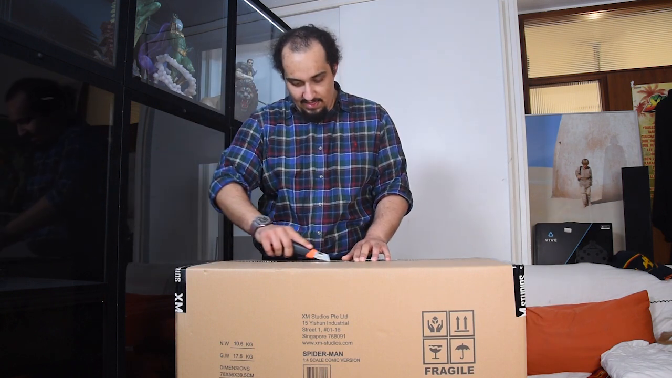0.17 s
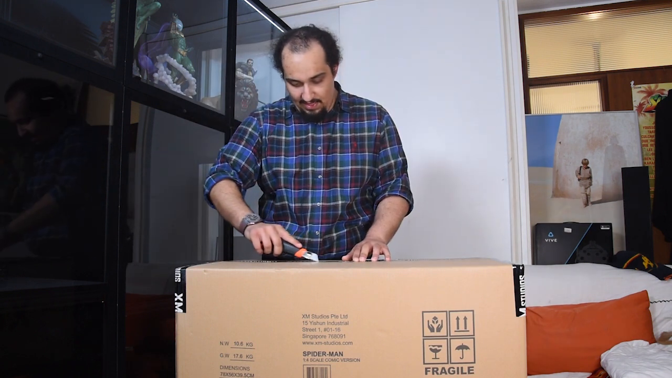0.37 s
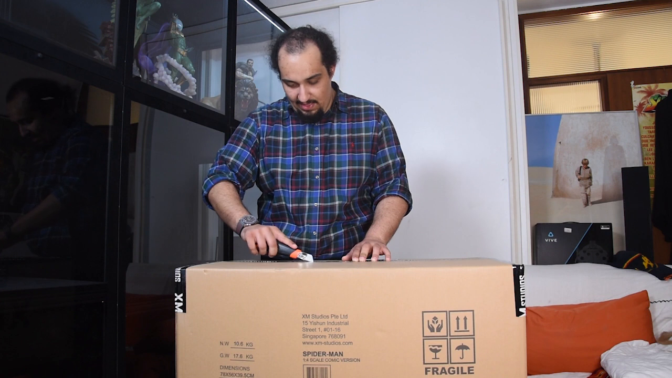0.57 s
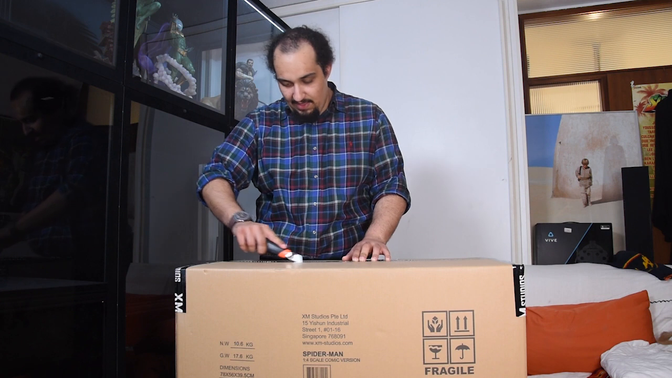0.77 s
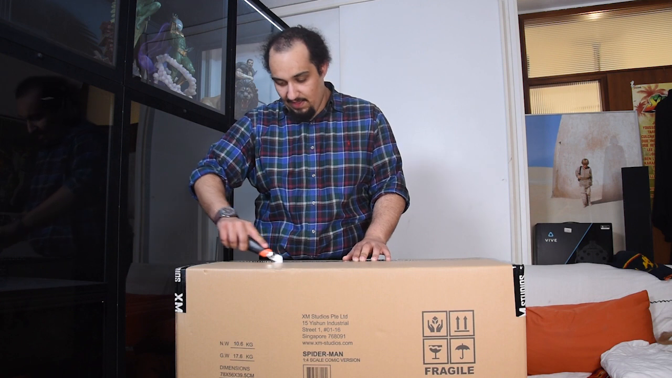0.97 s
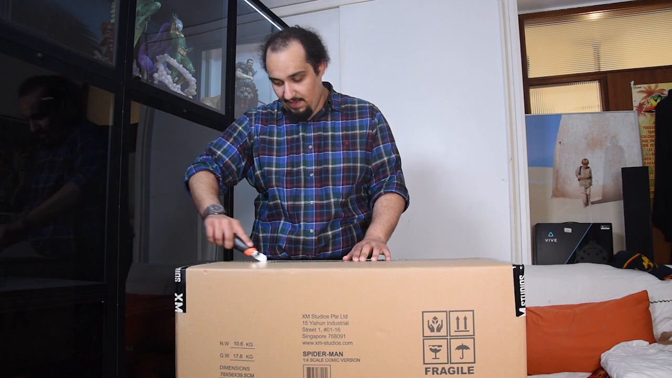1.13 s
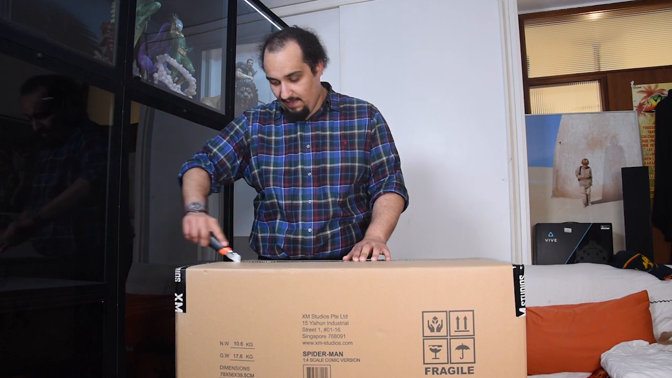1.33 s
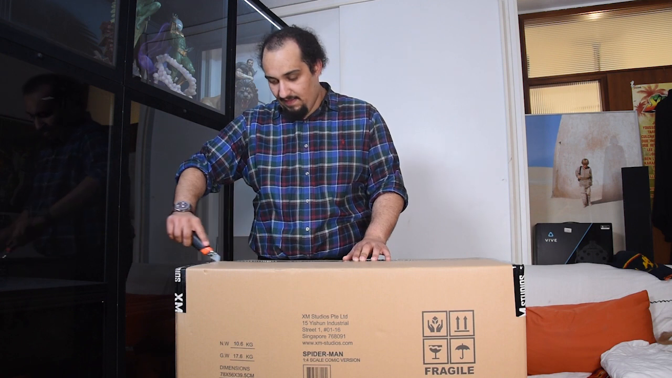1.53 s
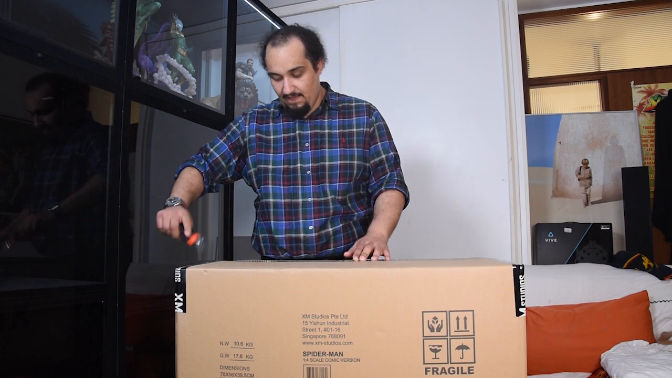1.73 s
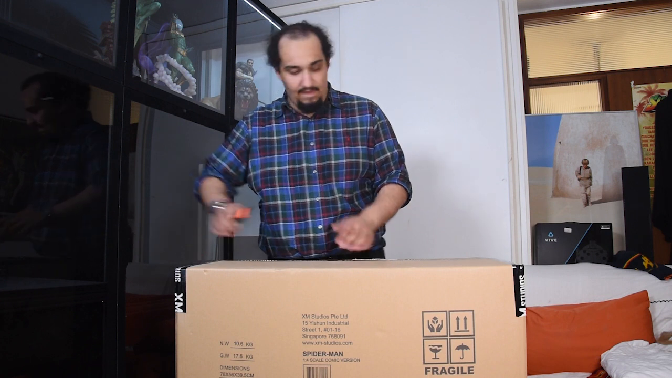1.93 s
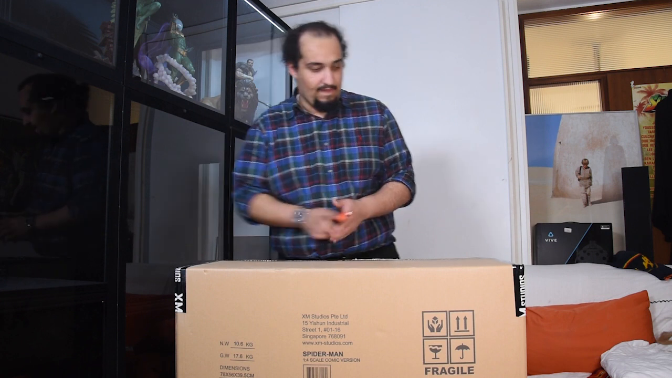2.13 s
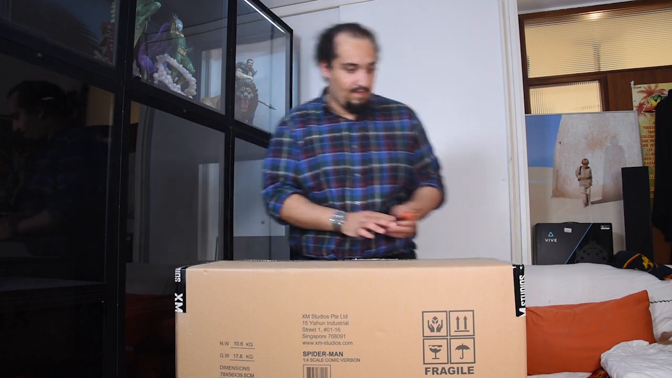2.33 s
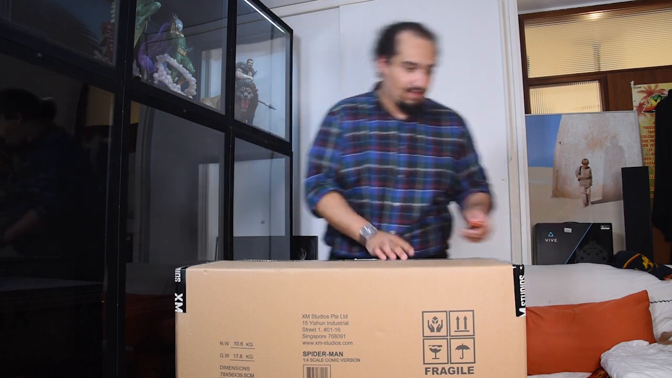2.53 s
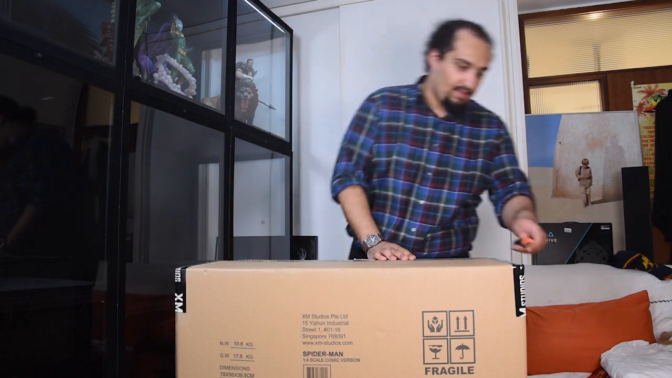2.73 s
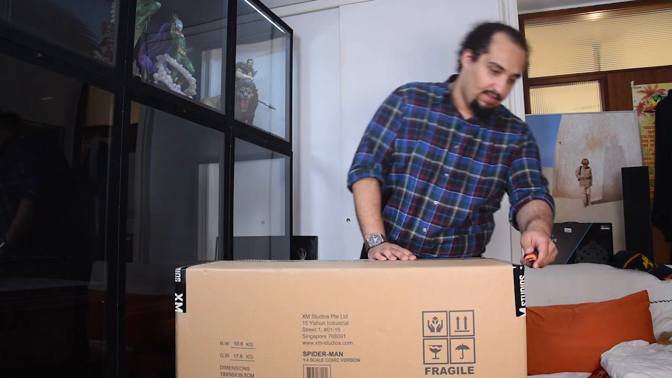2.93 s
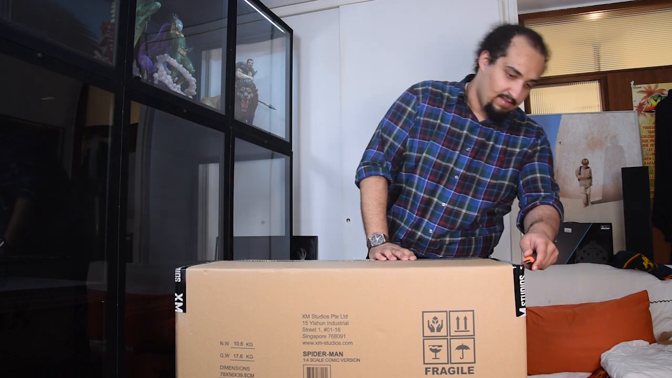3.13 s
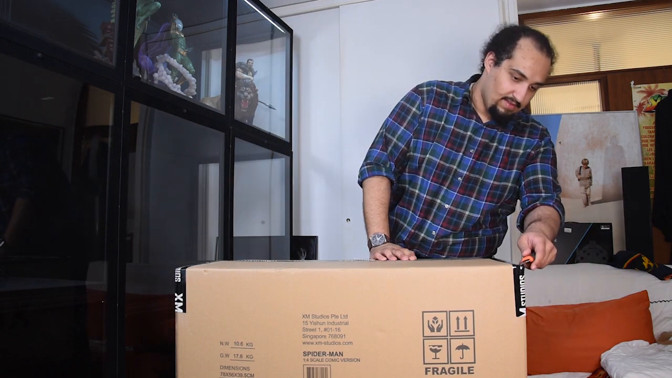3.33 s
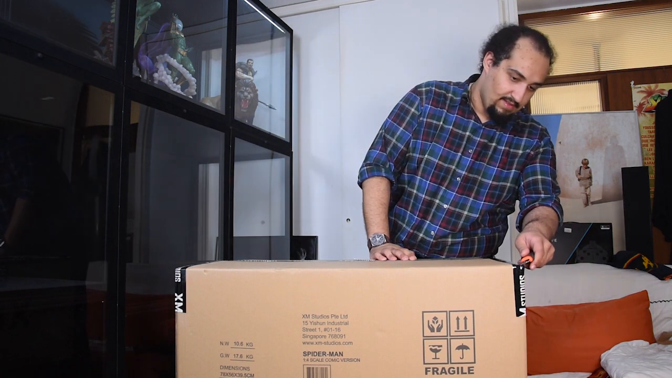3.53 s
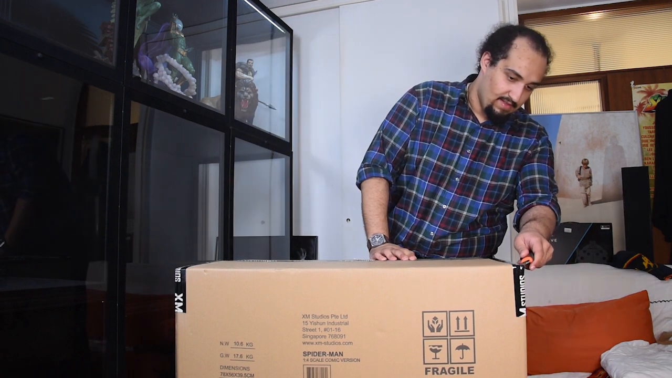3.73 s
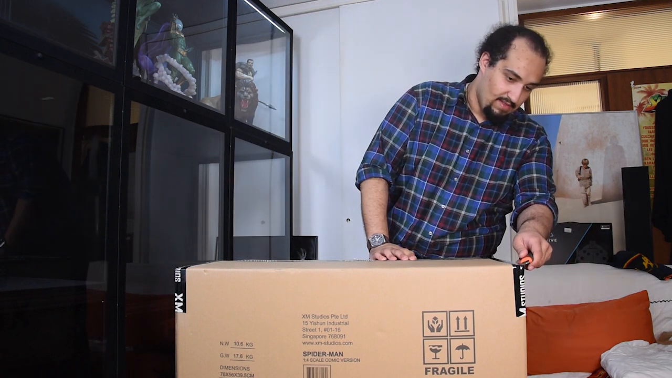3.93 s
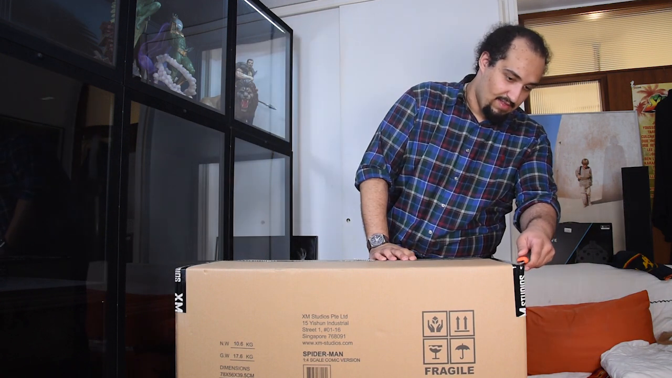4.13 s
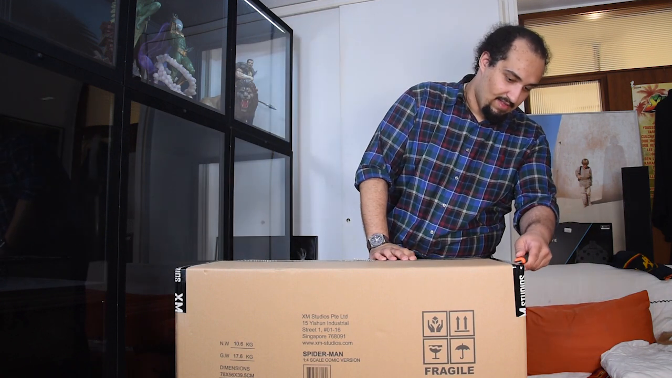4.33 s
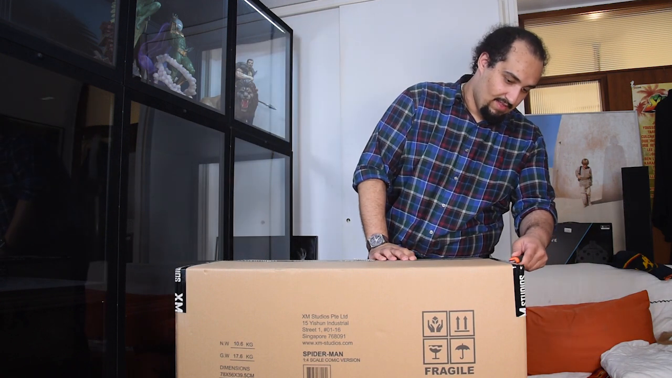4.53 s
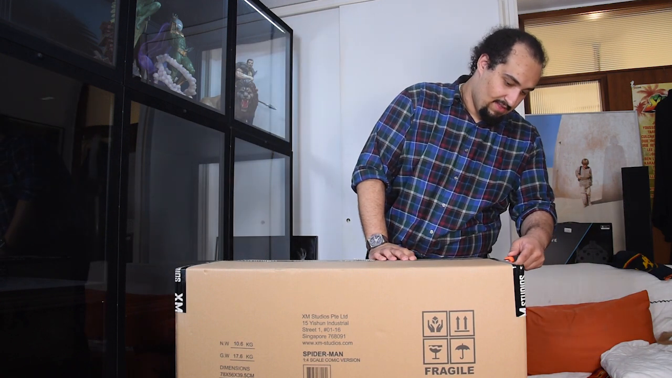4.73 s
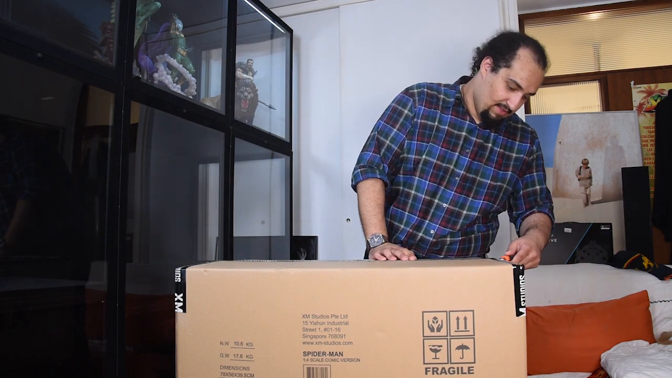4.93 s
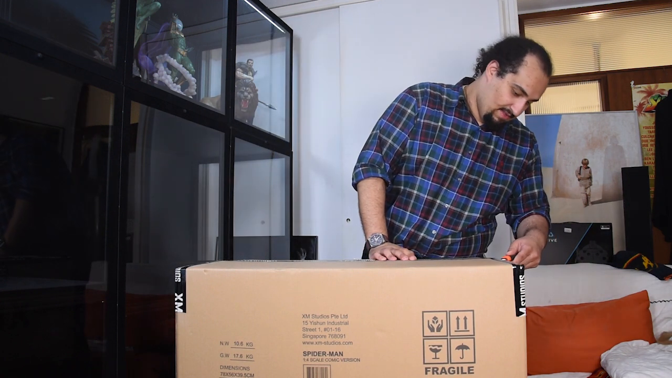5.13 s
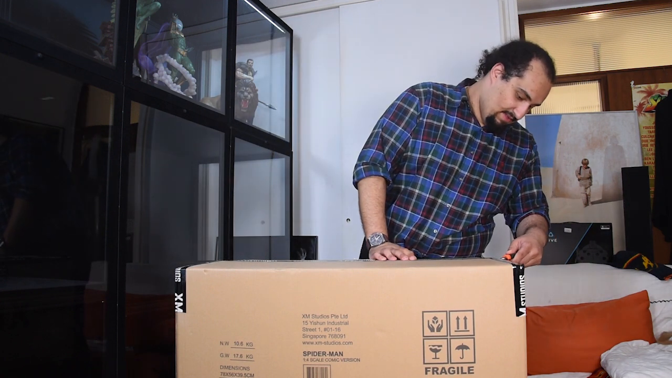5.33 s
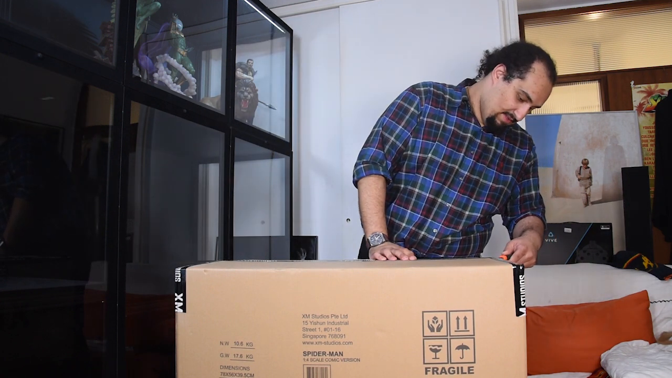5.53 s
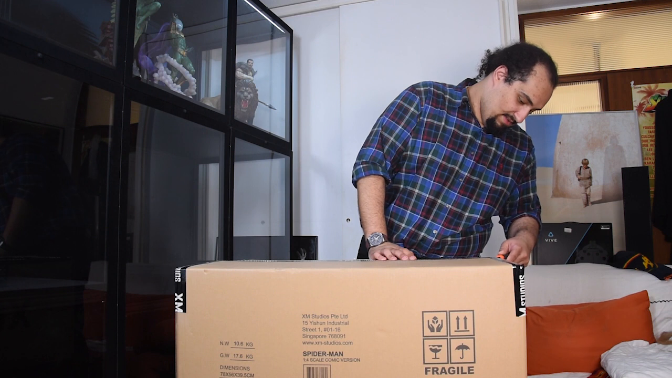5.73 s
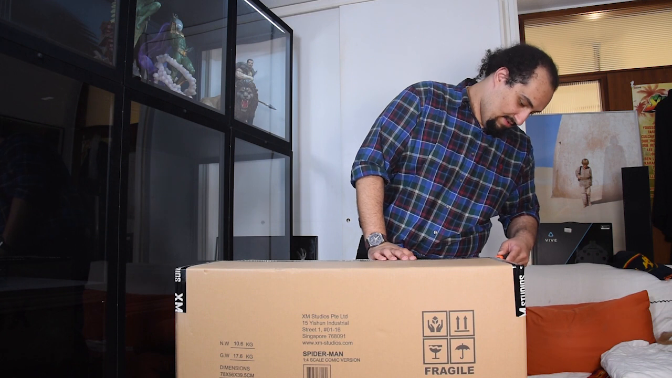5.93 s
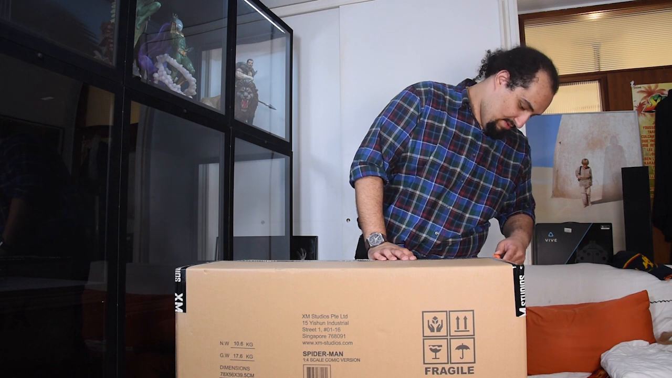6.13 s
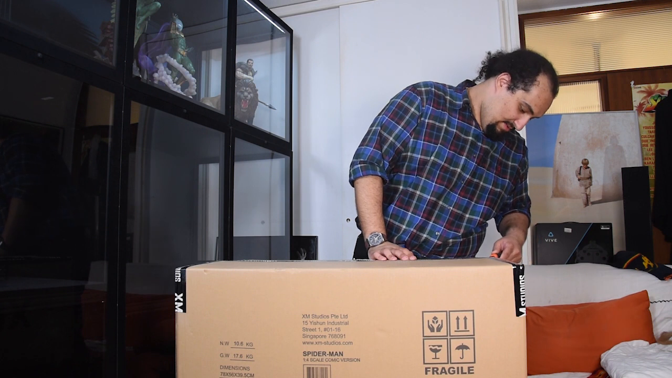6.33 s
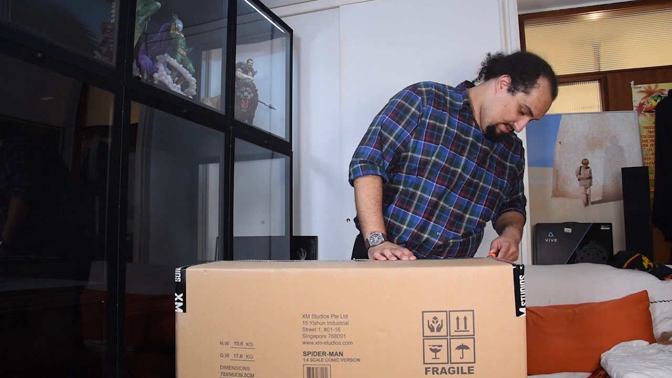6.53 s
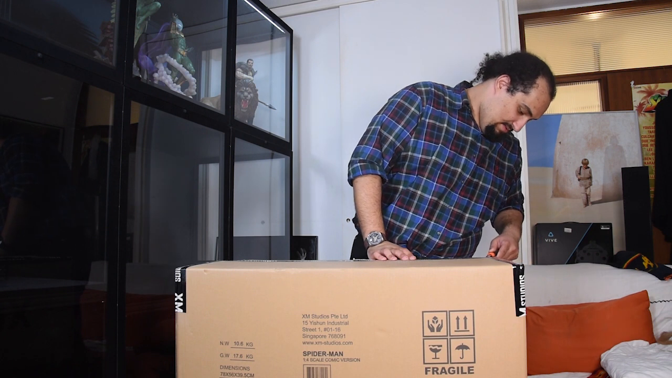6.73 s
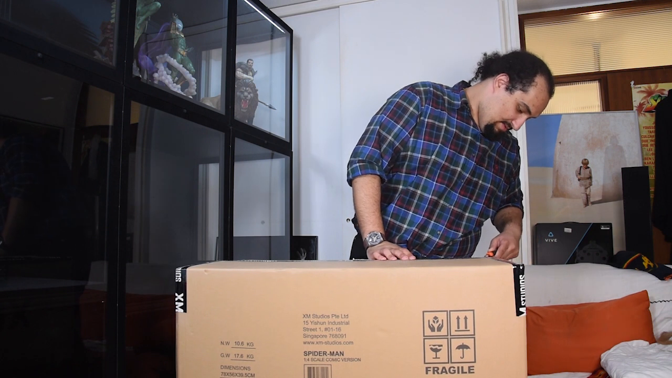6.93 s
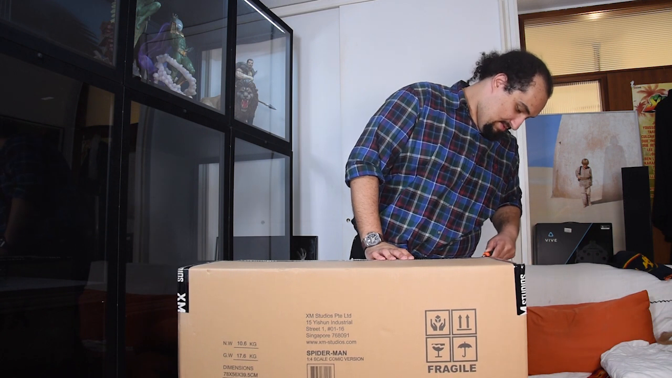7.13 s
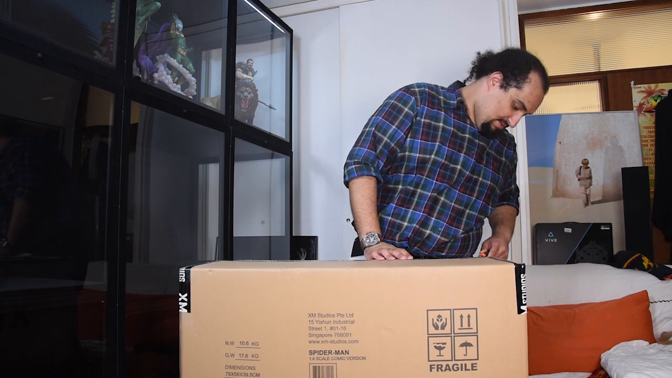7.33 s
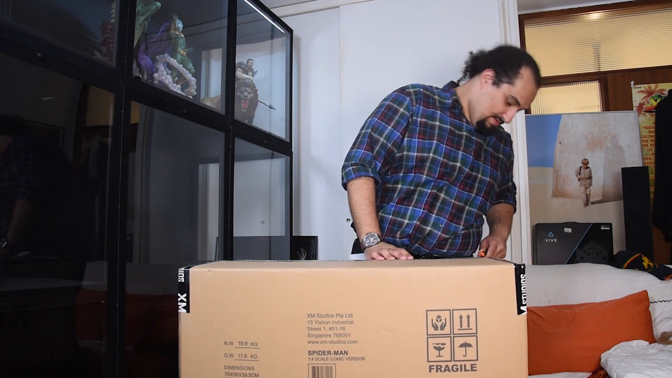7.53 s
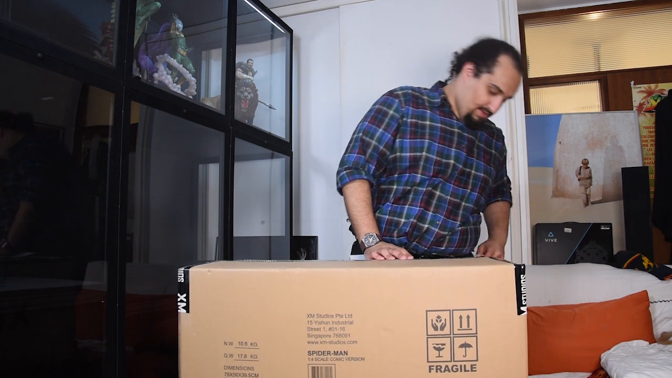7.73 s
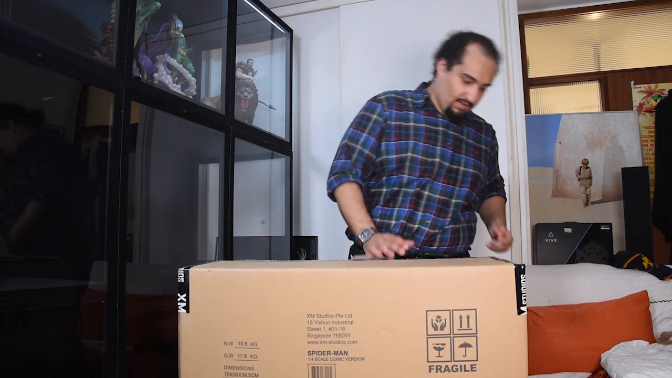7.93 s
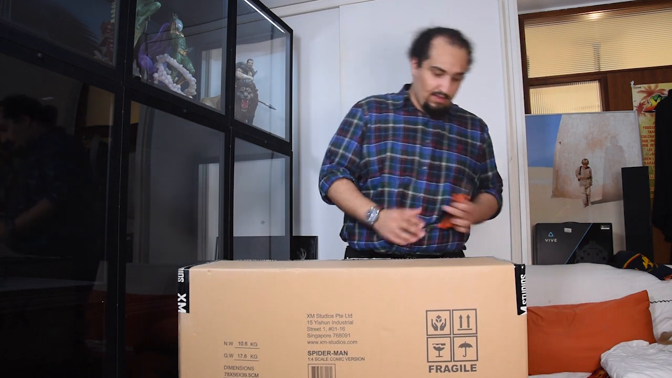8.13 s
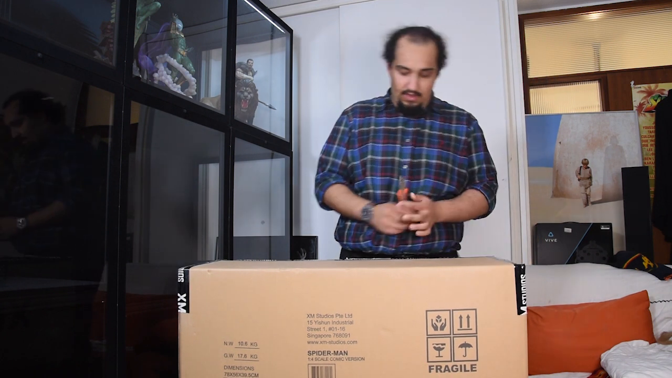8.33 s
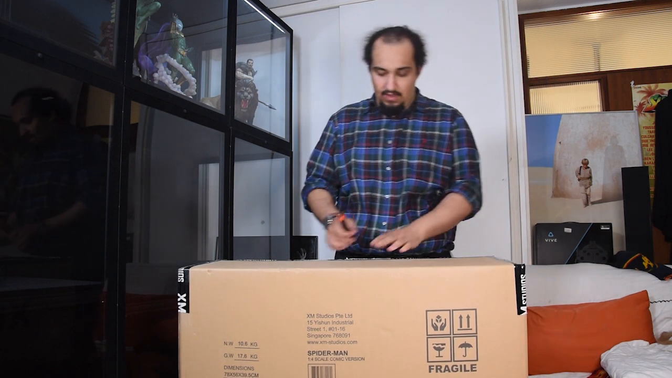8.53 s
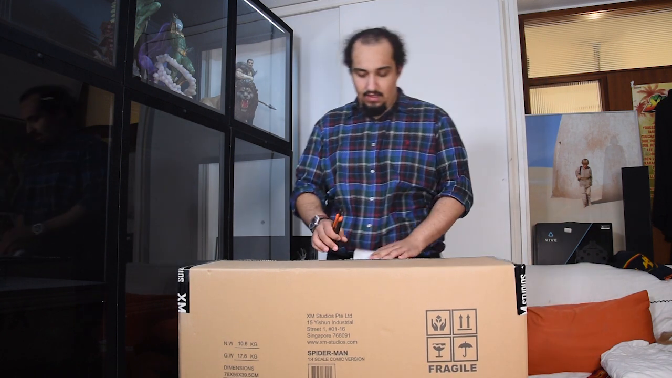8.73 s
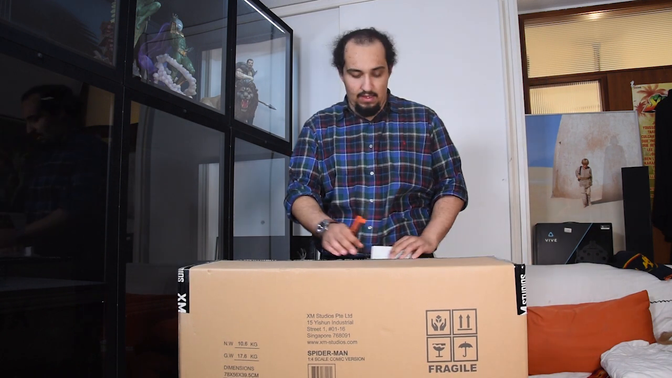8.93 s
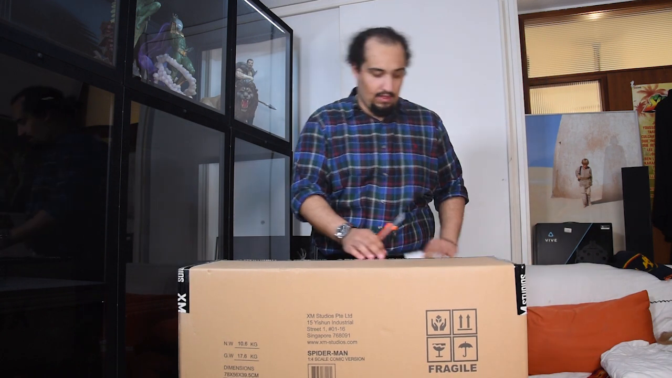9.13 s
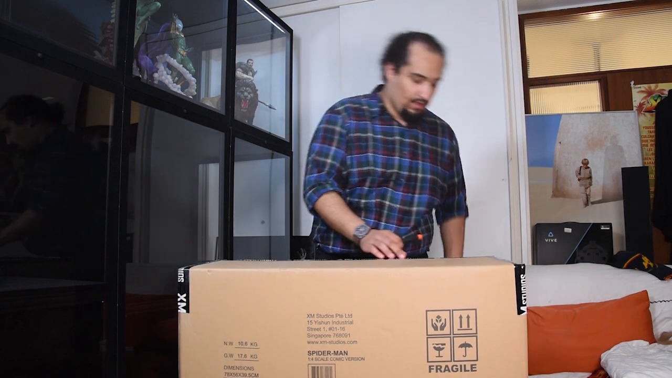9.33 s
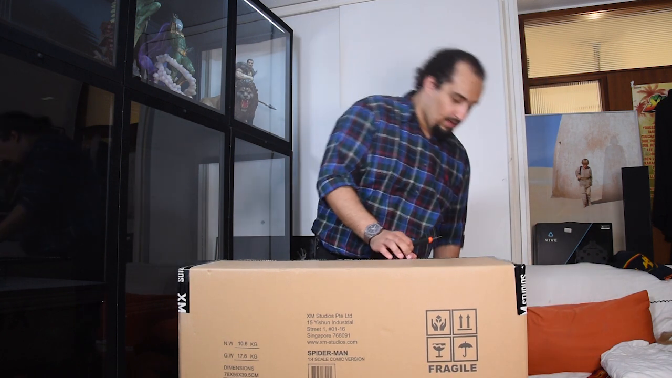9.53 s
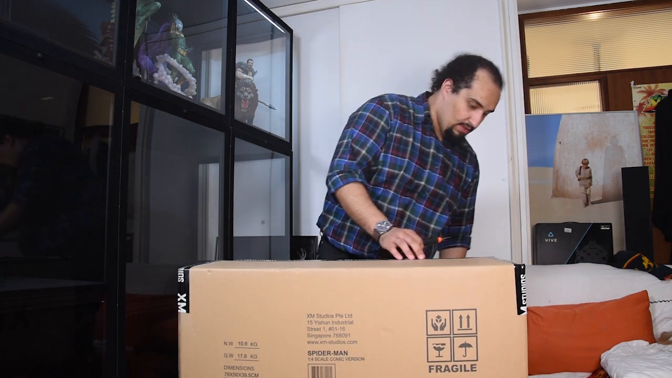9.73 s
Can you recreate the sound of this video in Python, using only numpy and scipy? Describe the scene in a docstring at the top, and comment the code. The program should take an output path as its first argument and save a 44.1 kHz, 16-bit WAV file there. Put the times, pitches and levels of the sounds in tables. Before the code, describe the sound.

Close up in a small furnished room, hands brush and knock a large cardboard box, then a knife rips tape in a gritty, juddering stroke. A quiet pause with a soft bump and faint handling follows. A loud crack opens a second, longer cut of uneven tearing, snaps and bright fibre ticks, ending with a hollow knock and a papery slide. Light steady hiss throughout.

```python
"""Hands slide and knock on a large cardboard box, then a knife slits its tape, in a small furnished room.
Fibres and glue break as dense tiny random cracks, filtered into the ring of tape, flap edge and panels.
The blade sticks and slips, tape snaps with a crack and a twang, light taps ring, single fibres tick.
Soft blows are decaying low tones; a close microphone hears it all over its own hiss."""
import sys
import numpy as np
from scipy import signal
from scipy.fft import rfft, irfft
from scipy.io import wavfile

SR = 44100
rng = np.random.default_rng(int(sys.argv[2]) if len(sys.argv) > 2 else 0)


def waveform_to_disk(signal):
    """Save audio, clipped to [-1, 1], as 16-bit WAV at the path in sys.argv[1]."""
    frames = np.transpose(np.atleast_2d(signal))
    scaled = np.clip(frames, -1, 1) * 32767
    samples = np.round(scaled).astype(np.int16)
    wavfile.write(sys.argv[1], SR, samples)


def volts_from_decibels(level):
    """Turn decibel levels (scalar or array-like) into linear amplitude factors."""
    exponent = np.asarray(level, float) / 20
    return 10 ** exponent


N = 431298

# All levels below are set before the final mix gains and the rounding of peaks.
# Palms, sleeves and paper sliding on the box, long slides continued in a further curve:
# time_s, crackle_db, flap_db
SLIDE_CURVES = [
    [(0.0, -57, -36.5), (0.094, -73, -56), (0.1, -37, -37.5), (0.154, -78, -73), (0.17, -46, -48),
     (0.32, -51, -48.5), (0.352, -60, -51), (0.49, -82, -54)],
    [(0.6, -52, -54), (0.642, -67, -59), (0.656, -40, -22.5), (0.67, -50, -39), (0.702, -58, -69),
     (0.712, -41, -53), (0.75, -50, -56), (0.76, -47, -57)],
    [(1.76, -51, -61), (1.79, -62, -73), (1.798, -42, -36), (1.826, -59, -51), (1.898, -43, -53),
     (1.924, -72, -71), (1.964, -59, -79), (2.15, -63, -70)],
    [(2.16, -51, -64), (2.188, -43, -50), (2.204, -57, -45), (2.224, -44, -55), (2.284, -46.5, -46.5),
     (2.666, -46, -49.5), (2.676, -37.5, -43.5), (2.8, -48, -55)],
    [(2.8, -46, -50), (2.874, -47, -50), (3.272, -45, -60), (3.286, -39, -52), (3.352, -47, -72),
     (3.404, -46, -50), (3.438, -58, -71), (3.48, -67, -69)],
    [(3.63, -83, -79), (3.674, -28.5, -50), (3.766, -75, -82), (3.778, -43, -63), (3.8, -67, -81),
     (3.918, -47, -86), (3.922, -69, -45), (4.02, -79, -90)],
    [(8.0, -46, -48), (8.216, -63, -62), (8.342, -49, -55), (8.438, -67, -56), (8.446, -44, -59),
     (8.492, -43, -36.5), (8.6, -60, -59), (8.68, -52, -50)],
    [(8.69, -51, -58), (8.708, -40.5, -36), (8.746, -31, -45), (8.848, -25, -52.5), (9.038, -25, -52),
     (9.23, -29, -34.5), (9.254, -35, -46), (9.48, -43.5, -56.5)],
    [(9.49, -44, -45), (9.508, -61, -52), (9.528, -31.5, -58), (9.652, -45.5, -51), (9.664, -50, -45),
     (9.676, -49, -50), (9.708, -45, -52.5), (9.78, -41, -48)],
]
# What else each slide curve shakes: scrape_db (re blend of crackle and flap), wall_db (re flap),
# panel_db (re flap)
SLIDE_MIX = [(0.5, -0.5, 2), (0, -3.5, 6.5), (2, -0.5, -3), (4, -1, -7), (4, 1, -19), (4.5, 3, -4),
             (6, -1.5, -19), (4.5, -2.5, -6.5), (6, 1.5, -3)]
# Knife strokes through tape and board, long ones continued in a second curve: time_s, crackle_db, flap_db
CUT_CURVES = [
    [(0.76, -42, -54), (0.778, -45, -34), (0.852, -37, -39), (0.876, -28, -19), (0.898, -26, -21),
     (0.902, -27, -27), (1.056, -26, -28.5), (1.07, -25, -28), (1.078, -25, -27.5), (1.2, -24, -28),
     (1.25, -26, -27)],
    [(1.25, -25, -33), (1.272, -25, -24), (1.28, -31, -30.5), (1.32, -24.5, -23.5), (1.508, -21, -28.5),
     (1.562, -34, -36), (1.622, -23.5, -24.5), (1.648, -33, -44), (1.656, -16.5, -26), (1.758, -66, -73),
     (1.76, -42, -60)],
    [(4.03, -67, -40), (4.038, -42, -53), (4.056, -40.5, -46.5), (4.176, -40, -31.5), (4.184, -23, -38),
     (4.206, -40, -32), (4.22, -10, -32), (4.228, -6.5, -31.5), (4.286, -30, -53.5), (4.354, -51, -49),
     (4.4, -42, -49)],
    [(4.4, -44, -45), (4.496, -29.5, -27), (4.512, -30.5, -39), (4.852, -36, -37.5), (4.982, -36.5, -46),
     (4.988, -23, -55), (5.028, -34, -41), (5.064, -26, -20), (5.106, -35, -32), (5.252, -30.5, -32.5),
     (5.37, -67, -83)],
    [(5.44, -41, -46), (5.484, -41, -47), (5.488, -33, -38), (5.566, -29.5, -27), (5.58, -15.5, -12.5),
     (5.592, -17, -22), (5.68, -28.5, -30), (5.8, -27.5, -21.5), (6.228, -34, -25), (6.24, -26, -24),
     (6.28, -31, -50)],
    [(6.28, -34.5, -31.5), (6.36, -26.5, -31.5), (6.476, -30.5, -24), (6.494, -18, -28.5),
     (6.542, -29.5, -27.5), (6.864, -32.5, -34), (6.978, -32, -24), (6.992, -32, -33),
     (7.024, -18.5, -27.5), (7.116, -34, -48), (7.32, -42.5, -44.5)],
    [(7.32, -42, -42), (7.352, -28, -49), (7.388, -34, -33), (7.396, -24, -36.5), (7.542, -43, -47.5),
     (7.566, -27.5, -35), (7.732, -27, -30.5), (7.772, -16, -24), (7.824, -36, -43.5), (7.94, -43, -51),
     (8.0, -42, -51)],
]
# What else each cut curve shakes: scrape_db (re blend of crackle and flap), wall_db (re flap),
# panel_db (re flap)
CUT_MIX = [(-3, -3, -2), (1.5, -5.5, -8), (3, -8, -24), (1, -11, -17), (-1, -14, -18.5), (-1.5, -7, -14),
           (1.5, -1.5, -11)]
# Judder of the first cut as the blade sticks and slips: time_s, depth_db (negative turns the phase)
STICK_SLIP = [(.95, 5.0), (1.27, 2.5), (1.34, 4), (1.6, -3.5)]
# Hands, feet and flaps landing: start_s, level_db, pitch_hz, t60_s
THUDS = [(0.048, -20.5, 164, 0.036), (0.505, -21.5, 173, 0.16), (0.651, -17, 193, 0.06),
         (0.872, -14.5, 281, 0.17), (2.512, -28.5, 66.4, 0.28), (2.638, -19, 195, 0.084),
         (2.639, -26, 595, 0.045), (7.67, -18, 326, 0.053), (7.762, -10.5, 560, 0.069),
         (8.03, -29, 191, 0.1), (8.478, -24, 754, 0.077), (8.712, -20, 174, 0.097)]
# Tape and fibres snapping: start_s, crack_db, burst_db (re crack), knock_db (re crack), twang_hz
SNAPS = [(0.3088, -25, -8, -13, 2260), (0.5109, 6, -15, -12, 1880), (0.872, -12.5, -1.5, -1, 2770),
         (0.891, -12, 2, -19, 3500), (0.9685, -14, -10, -14, 2770), (0.9926, -14, -4, -1.5, 2560),
         (1.101, -10.5, -1.5, -5, 4500), (1.267, -7.5, -11, -10, 1700), (1.3254, -12.5, -3, -7, 2650),
         (1.4144, -13, -11, -9, 2730), (1.485, -15, -22, -8, 3070), (1.655, -12, -33, -24, 4360),
         (1.7976, -35, -11, -10, 1940), (3.67, -17, -13, -29, 2600), (4.038, -28, -16, -12, 2720),
         (4.0552, -21, -10, -26, 3800), (4.116, -16.5, -16, -17, 1980), (4.1848, -8, -13, -14, 1980),
         (4.2154, -6.5, -15, -7, 1960), (4.2232, -5.5, -2.5, -39, 3880), (4.4807, -22.5, -9, -4, 1990),
         (4.5725, -14, -18, -29, 2990), (4.6915, -24, -4, -14, 3750), (4.798, -18, -11, -19, 4450),
         (4.9008, -14.5, -10, -34, 2840), (4.988, -11, -5, -20, 4370), (5.0483, -14.5, -18, -9.5, 4440),
         (5.142, -12, -9, -28, 3900), (5.2346, -13.5, -9, -10, 2960), (5.4795, -8.5, -14, -18.5, 4570),
         (5.5797, -4.5, -3, -8.5, 4300), (5.718, -12, -9, -14, 2710), (6.237, -16.5, -4, -7.5, 2680),
         (6.3647, -10.5, -11, -11.5, 4520), (6.4946, -10.5, -8.5, -6.5, 2300), (6.893, -7, -18, -17, 2400),
         (6.9608, -7.5, -9, -13, 4460), (7.0087, -11, -15, -8.5, 3140), (7.3343, -19.5, -16, -19, 3920),
         (7.351, -10.5, -6, -23, 4670), (7.398, -10, -3, -11, 3430), (7.459, -20, -20, -10.5, 4500),
         (7.494, -12, -11, -15, 2200), (7.664, -14, -3.5, -5.5, 2740), (7.744, -9, -9, -3.5, 2380),
         (7.7656, -6, -14, -11, 2250), (7.7857, -11, -11, -20, 2230), (8.447, -25, -5, -9, 4500),
         (9.5262, -18, -11, -17, 3380), (9.5857, -24, -5, -13, 3020), (9.6633, -15.5, -16, -17.5, 2690)]
# Light taps of knife or finger: start_s, ring_db, pitch_hz, crack_db (re ring), knock_db (re ring)
TAPS = [(0.0988, -33.5, 1900, -17, -8), (0.171, -40.5, 3900, -8, -4), (0.6542, -27, 2560, -5, 1),
        (0.7831, -45, 2760, -10, -6), (1.8861, -48, 1760, -8, -5), (1.9674, -41, 3000, -8, -14),
        (2.1834, -39, 3030, -11, -3), (2.2193, -30.5, 2700, -2, -2.5), (2.3894, -40, 2060, -8, -4),
        (3.284, -35.5, 2760, -8, -1), (3.557, -47, 2570, -8, 3), (3.6517, -31.5, 2600, -12, -7),
        (3.775, -45, 2020, -8, -6), (4.143, -27, 1840, -1, -12), (4.2232, -8.5, 3700, -3, -9.5),
        (4.4314, -34.5, 2530, -8, -12), (4.594, -19.5, 3000, -8, -9.5), (5.0582, -25, 2740, 0, -1),
        (5.43, -41, 2250, -8, -8), (7.016, -21, 3530, -8, -2), (7.148, -30.5, 3250, -8, -1),
        (7.7714, -14, 2260, -14, -9), (8.0208, -33.5, 1700, 3, 2), (8.328, -31.5, 1760, -8, -20),
        (8.4795, -32, 1870, -5, -16), (9.177, -24, 2410, -8, 1), (9.2005, -30, 3920, -10, -10),
        (9.4669, -41, 2430, -8, -8), (9.5325, -28, 3430, -8, -12), (9.7423, -30, 2220, -8, -6)]
# Thin bright ticks of single fibres: start_s, level_db
TICKS = [(1.2398, -10), (1.268, -2.5), (1.327, -6), (1.5002, -14.5), (1.764, -19.5), (3.0704, -22.5),
         (4.6577, -24), (4.799, -17), (6.7164, -13.5), (7.0736, -15), (7.3335, -13.5), (7.3958, -2.5),
         (7.4124, -7), (9.6639, -11.5)]

# Resonances of flap edge, panels, walls and dull board: pitch_hz, width_hz, level_db
FLAP = [(640, 45, -6), (785, 45, -2), (865, 60, 0), (1060, 90, -6), (1350, 90, -8)]
PANEL = [(101.5, 28, -3), (174, 66, 5), (220, 30, 1)]
WALL = [(301, 60, -1.5), (363.5, 19.5, 4), (508, 150, -4.5)]
BOARD = [(530, 1000, -2.5), (1390, 800, 3)]
# Resonances that colour a sharp crack and a fibre tick: pitch_hz, width_hz, level_db
CRACK = [(2330, 4340, 4.5), (5460, 5340, 8.5), (8300, 2120, 10), (11600, 23000, -11)]
TICK = [(6470, 2900, 2), (9100, 3300, 2)]
# Spectrum shapes of tape crackle and of blade or palm scrape: frequency_hz, level_db (per Hz)
TAPE = [(2060, -54.5), (3500, -13.5), (7540, -13.5), (10600, -18.5), (15600, -31.5)]
SCRAPE = [(250, -3), (900, 2), (1600, 6), (2100, 5.5), (2700, 7), (3200, 4.5), (3800, -2), (4600, 0),
          (6500, -22)]
# Spectrum shapes of the hiss, shared and between the ears: frequency_hz, level_db (per Hz)
HISS = [(12, -46), (20, -13), (137, 5), (202, -2.5), (428, -7.5), (650, -6.5), (1270, -9), (1420, -8.5),
        (2550, -11), (5110, -15), (8670, -14), (11500, -15.5), (15600, -10)]
SIDE_HISS = [(12, -31), (20, 1), (443, -8.5), (1160, -10.5), (1790, -11.5), (3270, -8.5), (9800, -6.5),
             (12500, -7), (14000, -12)]

CUT_ROUGH_DB, SLIDE_ROUGH_DB = 3.0, 1.4
SMOOTH_CRACKS_PER_S = 30000   # density at roughness 0
SCRAPE_FOLLOWS_TAPE = 0.53   # share of tape crackle in the blend; the rest is flap
PATCHY_DB, PATCHES_PER_S = 1.6, 12   # uneven board: each part swells on its own
JUDDER_HZ, JUDDER_PEAK_S = 37.54, 1.106
TAPE_JUDDER = 0.51   # the tape feels the judder this much more
HISS_DB, SIDE_HISS_DB = -44.5, -58.5
ROOM_T60_S, ROOM_DB = 0.24, -5.5
BURST_T60_S, TICK_T60_S = 0.045, 0.0054
SNAP_TWANG_DB, TAP_BURST_DB = -19, 1   # re the crack
TWANG_WIDTH, TAP_WIDTH = 0.18, 0.11   # share of the pitch
BOARD_DB = 2   # dull answer of the board to a knock


def rms_one(x):
    """Scale to rms 1."""
    return x / np.sqrt(np.mean(x ** 2) + 1e-20)


def in_time(rows):
    """Columns of a curve table at every sample."""
    s, *columns = np.transpose(rows)
    return [np.interp(np.arange(N) / SR, s, c) for c in columns]


def coloured(x, spectrum):
    """Shape x by a spectrum drawn straight between its points in log frequency."""
    hz, level = np.transpose(spectrum)
    f = np.maximum(np.arange(N // 2 + 1) * SR / N, 1)
    gain = volts_from_decibels(np.interp(np.log(f), np.log(hz), level))
    return irfft(rfft(x) * gain, N)


def even(x, spectrum):
    """Colour x without changing the power of a noise."""
    return coloured(x, spectrum) / np.std(coloured(rng.standard_normal(N), spectrum))


def body(x, peaks):
    """Parallel resonances, scaled so that a noise of rms 1 comes out at rms 1."""
    out, answer = 0, 0
    for k, (hz, width, db) in enumerate(peaks):
        r = np.exp(-np.pi * width / SR)
        sign = (-1) ** k   # neighbours ring in opposite phase
        b = volts_from_decibels(db) * sign * (1 - r * r) / 2 * np.array([1, 0, -1])
        a = [1, -2 * r * np.cos(2 * np.pi * hz / SR), r * r]
        out = out + signal.lfilter(b, a, x + 1e-18)
        answer = answer + signal.lfilter(b, a, np.eye(1, 8192)[0])
    return out / np.sqrt(np.sum(answer ** 2))


def drift(rate):
    """Slow random wander of spread 1: noise through two equal low-pass poles at rate (Hz)."""
    r = np.exp(-2 * np.pi * rate / SR)
    return rms_one(signal.lfilter([1], [1, -2 * r, r * r], rng.standard_normal(N)))


def cracks(rough_db):
    """Random tiny fractures; the rougher, the fewer and the more uneven. Mean power stays 1."""
    s = rough_db * np.log(10) / 20
    per_s = SMOOTH_CRACKS_PER_S * volts_from_decibels(-4 * rough_db)
    uneven = np.minimum(rng.exponential(1, N), 5)
    born = rng.random(N) < per_s / SR
    rare = np.exp(-5 * (1 - 2 * s))   # share of power from sizes at the limit
    power = ((1 - rare) / (1 - 2 * s) + rare) * per_s / SR   # mean square size times density
    return born * rng.standard_normal(N) * np.exp(s * uneven) / np.sqrt(power)


def strokes(curves, mixes):
    """Gains of the five shaken parts: crackle, scrape, flap, wall, panel; zero outside the curves."""
    t, parts = np.arange(N) / SR, np.zeros((5, N))
    for rows, (scrape_db, wall_db, panel_db) in zip(curves, mixes):
        tape, flap = in_time(rows)
        both = SCRAPE_FOLLOWS_TAPE * tape + (1 - SCRAPE_FOLLOWS_TAPE) * flap
        on = (t >= rows[0][0]) & (t < rows[-1][0])
        levels_db = np.array([tape, both + scrape_db, flap, flap + wall_db, flap + panel_db])
        parts += on * volts_from_decibels(levels_db)
    return parts


def drag():
    """Palm or blade moving on the box: one stream of cracks with wobbling force shakes all its parts."""
    palm, knife = strokes(SLIDE_CURVES, SLIDE_MIX), strokes(CUT_CURVES, CUT_MIX)
    patches = volts_from_decibels(PATCHY_DB * np.array([drift(PATCHES_PER_S) for part in knife]))
    crackle, scrape, flap, wall, panel = (knife + palm) * patches
    rough_db = np.where(knife[0] > 0, CUT_ROUGH_DB, SLIDE_ROUGH_DB)
    t = np.arange(N) / SR
    juddering = (t > .9) & (t < 1.62)
    wave = np.cos(2 * np.pi * JUDDER_HZ * (t - JUDDER_PEAK_S))
    judder_db = juddering * in_time(STICK_SLIP)[0] * wave
    wobble_db = 0.063 * rough_db * drift(42.0)
    force = cracks(rough_db) * volts_from_decibels(judder_db + wobble_db)
    # same crack times with random signs, so scrape and crackle do not cancel
    random_sign_force = force * rng.choice([-1, 1], N)
    out = even(force * crackle * volts_from_decibels(TAPE_JUDDER * judder_db), TAPE)
    out += even(random_sign_force * scrape, SCRAPE)
    for gain, peaks in ((flap, FLAP), (wall, WALL), (panel, PANEL)):
        out += body(force * gain, peaks)
    return out


def microphone_hiss():
    """Steady coloured noise common to both ears, plus a fainter one of opposite sign in each."""
    shared, side = [rms_one(coloured(rng.standard_normal(N), s)) for s in (HISS, SIDE_HISS)]
    return volts_from_decibels(HISS_DB) * shared + volts_from_decibels(SIDE_HISS_DB) * side * np.array([[1], [-1]])


def room(x, size=4096):
    """Dense dull reflections after 3 ms; their pattern cross-fades block by block as the hands move about."""
    t, out = np.arange(SR // 3) / SR, np.zeros(N + SR)
    fade, padded = np.hanning(2 * size), np.pad(x, (size, 2 * size))
    for at in range(0, N + size, size):
        echoes = rng.standard_normal(len(t)) * volts_from_decibels(-60 * t / ROOM_T60_S) * (t > .003)
        echoes = signal.lfilter([1], [1, -.3], echoes)   # softens the treble
        echoes = echoes / np.sqrt(np.sum(echoes ** 2))
        wet = signal.fftconvolve(padded[at:at + 2 * size] * fade, echoes)
        out[at:at + len(wet)] += wet
    return out[size:size + N]


def thuds():
    """Soft blows: a low ring that swells in a few ms, with a weaker partner 1.3 times higher."""
    out, t = np.zeros(N), np.arange(SR // 2) / SR
    for s, level_db, hz, t60 in THUDS:
        at = round(s * SR)
        tone = np.sin(2 * np.pi * hz * t) + 0.28 * np.sin(2 * np.pi * 1.3 * hz * t)
        swell = 1 - np.exp(-t / 0.0018)
        out[at:at + len(t)] += volts_from_decibels(level_db - 60 * t / t60) * swell * tone
    return out


def snaps_and_taps():
    """A sharp crack, then a dying burst of tearing that rings at one pitch and shakes flap, board and walls."""
    click, burst, twang, knock = np.zeros((4, N))
    t, force = np.arange(SR // 5) / SR, cracks(2.0)
    hits = []
    for s, crack_db, burst_db, knock_db, hz in SNAPS:
        hits.append((s, crack_db, burst_db, SNAP_TWANG_DB, hz, TWANG_WIDTH, knock_db))
    for s, ring_db, hz, crack_db, knock_db in TAPS:   # from re ring to re crack
        hits.append((s, ring_db + crack_db, TAP_BURST_DB, -crack_db, hz, TAP_WIDTH, knock_db - crack_db))
    for s, crack_db, burst_db, twang_db, hz, width, knock_db in hits:
        at = round(s * SR)
        attack = np.minimum(t / 0.0032, 1)
        swell = (volts_from_decibels(crack_db - 60 * t / BURST_T60_S) * attack)[:N - at]
        span = slice(at, at + len(swell))
        push = swell * force[span]
        click[at] += volts_from_decibels(crack_db + 9.5)
        burst[span] += volts_from_decibels(burst_db) * push
        twang[span] += body(volts_from_decibels(twang_db) * push, [(hz, width * hz, 0)])
        knock[span] += volts_from_decibels(knock_db) * push
    out = body(click + burst, CRACK) + volts_from_decibels(4.0) * twang
    for db, peaks in ((-9.5, FLAP), (BOARD_DB, BOARD), (-7.5, WALL)):
        out += volts_from_decibels(db) * body(knock, peaks)
    return out


def ticks():
    """Single fibres: a few ms of cracks heard only in the treble."""
    envelope, t = np.zeros(N + SR), np.arange(SR // 20) / SR
    for s, level_db in TICKS:
        envelope[round(s * SR):][:len(t)] += volts_from_decibels(level_db - 60 * t / TICK_T60_S)
    return body(envelope[:N] * cracks(0.94), TICK)


def scene():
    """Box sounds with their room, and dry thuds. One microphone feeds both ears."""
    box = drag() * volts_from_decibels(-2.0) + snaps_and_taps() + ticks()
    no_bass = signal.butter(4, 95, "high", fs=SR, output="sos")   # the box radiates no deep bass
    box = signal.sosfilt(no_bass, box)
    mid = box + volts_from_decibels(ROOM_DB) * room(box) + thuds()
    return np.array([mid, mid])


def band_limit(x):
    """A steep low-pass at the top of the band."""
    return signal.sosfilt(signal.butter(12, 15710, fs=SR, output="sos"), x)


def record(dry):
    """The microphone adds its hiss and rounds the peaks."""
    x = dry + microphone_hiss()
    mix = 1.18 * np.tanh(x / 1.444)
    return band_limit(mix)


dry = scene()
out = record(dry)
waveform_to_disk(out)
```